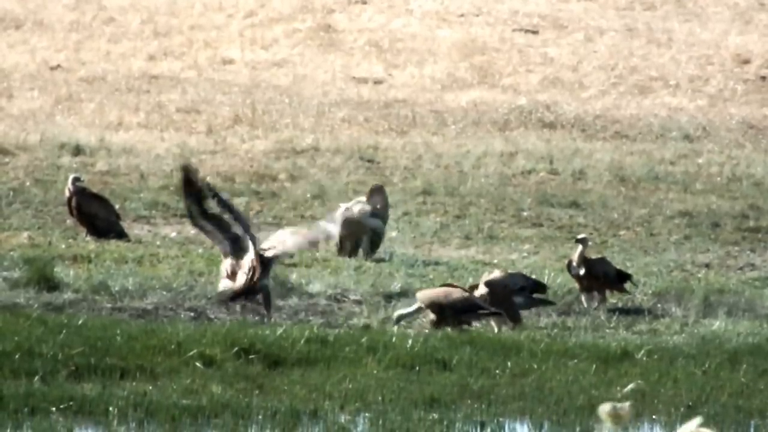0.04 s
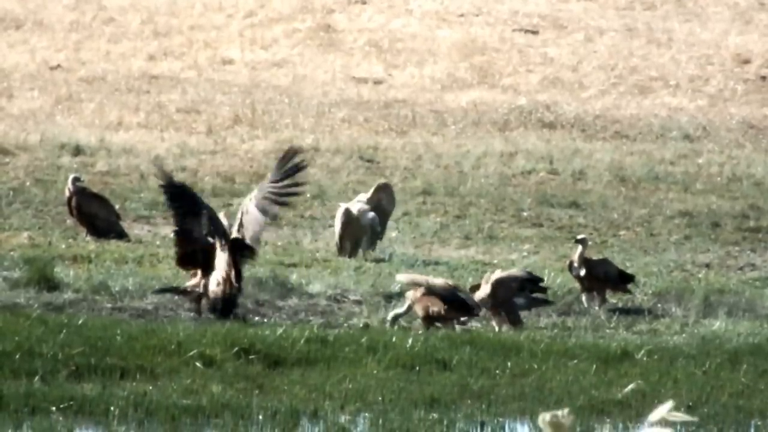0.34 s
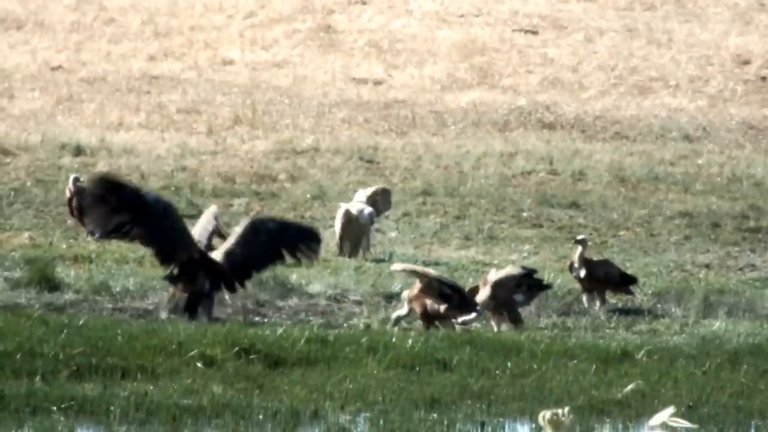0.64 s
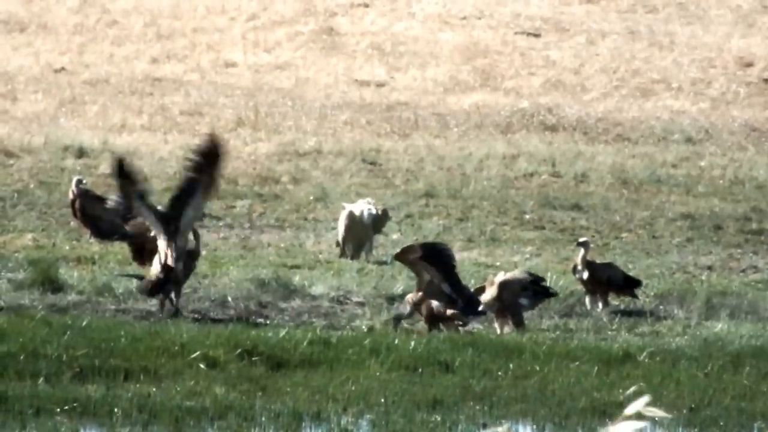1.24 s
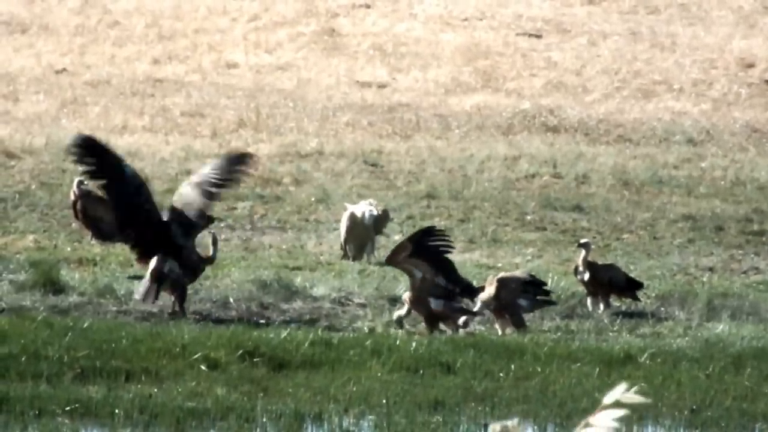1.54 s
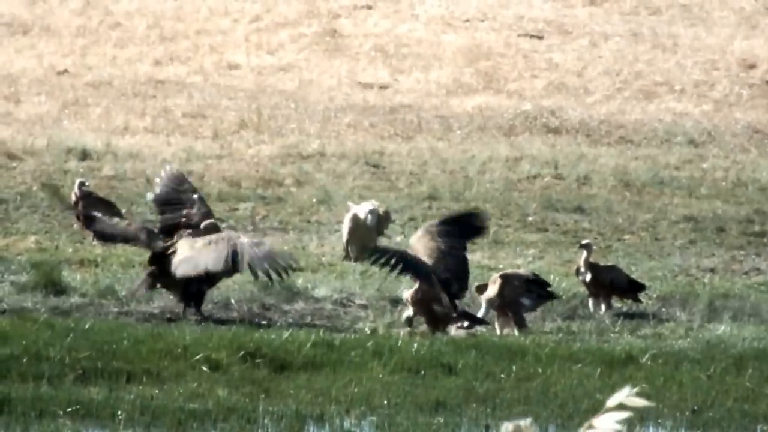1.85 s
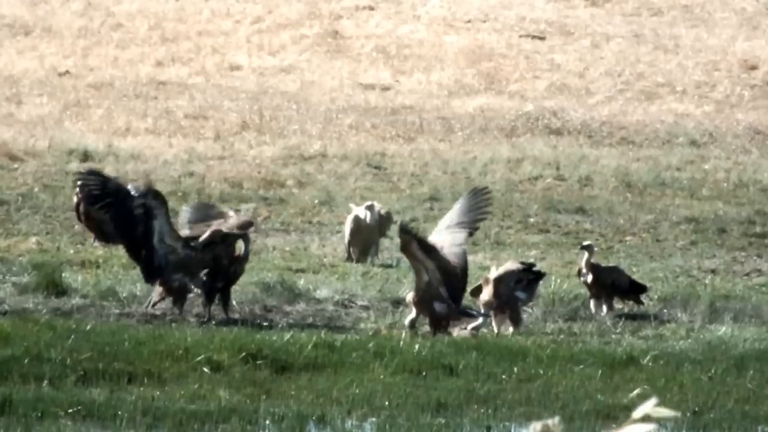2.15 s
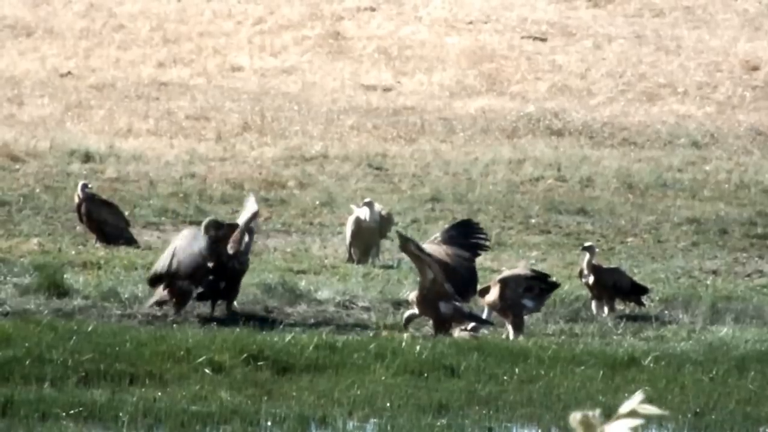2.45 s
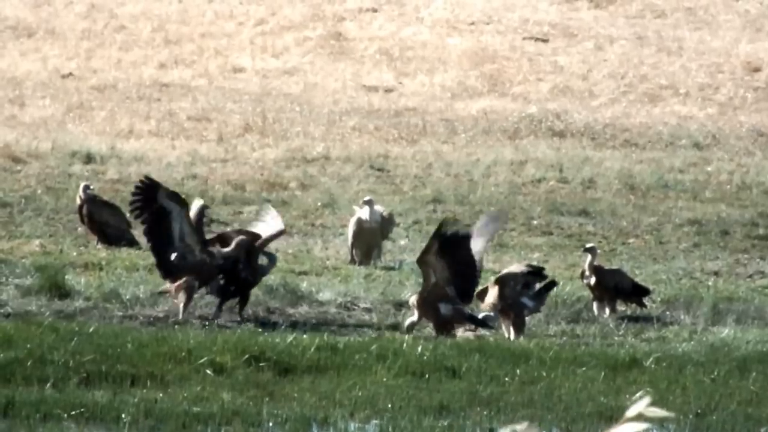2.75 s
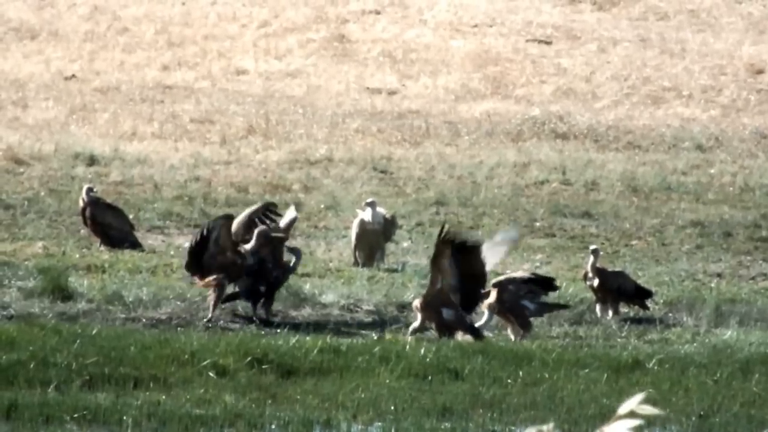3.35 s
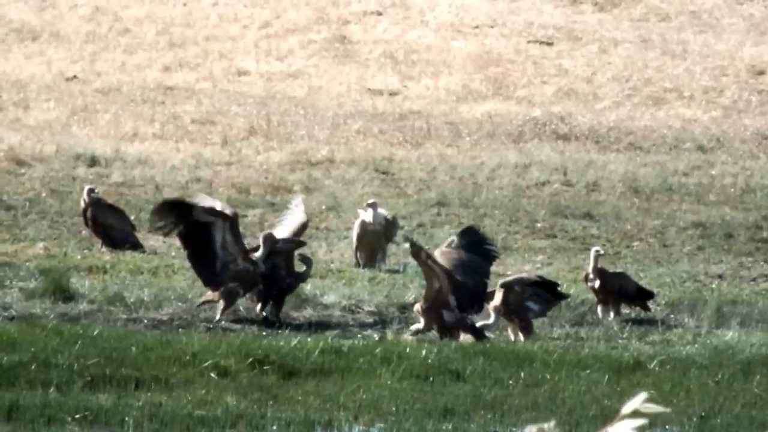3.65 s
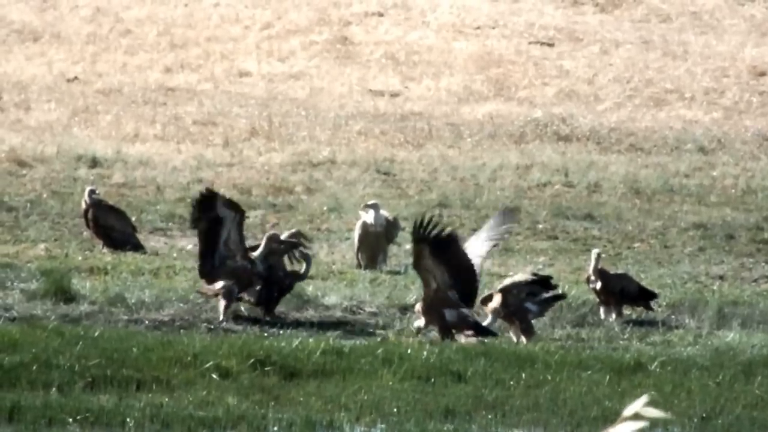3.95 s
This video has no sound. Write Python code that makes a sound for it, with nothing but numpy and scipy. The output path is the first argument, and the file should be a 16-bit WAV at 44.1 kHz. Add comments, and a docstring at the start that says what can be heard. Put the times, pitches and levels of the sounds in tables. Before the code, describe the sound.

Low, gusty wind buffets the left side of the microphone, drops to a brief lull, flutters, then builds to a louder, sputtering rumble. A faint, steady hiss of insects and grass and a few soft bumps fill the open field.

```python
"""A gusty low rumble is heard first: wind over open grassland buffets the left port of a camera microphone,
while the right port lies in its lee. Stronger gusts rumble brighter, spit and shed eddies that thump.
Behind them lie a steady hiss of grass and insects and the camera's thin whine, with a few ticks, far
squeaks and soft bumps. The recorder turns its gain down in the strongest gust."""
import sys
import numpy as np
from scipy import signal
from scipy.fft import rfft, irfft
from scipy.io import wavfile
from scipy.ndimage import uniform_filter1d

SR = 44100
rng = np.random.default_rng(int(sys.argv[2]) if len(sys.argv) > 2 else 0)


def wav_record(signal):
    """Record a signal, one row per channel, as 16-bit PCM in the file named by sys.argv[1]."""
    frames = np.transpose(np.atleast_2d(signal))
    bounded = np.clip(frames, -1, 1)
    # unit amplitude maps onto the largest positive 16-bit level
    quanta = np.round(bounded * 32767).astype(np.int16)
    wavfile.write(sys.argv[1], SR, quanta)


N = 176400
T = np.arange(N) / SR
HZ = np.maximum(np.arange(N // 2 + 1) * SR / N, 1)

# wind pressure at the exposed port: (time [s], relative level [dB])
GUST_PRESSURE = [(0,-34), (.07,-38), (.11,-39), (.33,-40), (.38,-33.5), (.49,-43), (.54,-34.5), (.57,-30),
                 (.61,-39), (.69,-32.5), (.74,-26.5), (.86,-30.5), (.935,-29), (.955,-44), (.975,-29),
                 (1.05,-35.5), (1.09,-39), (1.2,-31), (1.23,-37), (1.275,-33), (1.305,-42.5), (1.41,-42),
                 (1.43,-55), (1.68,-58.5), (1.73,-45), (1.8,-41.5), (1.86,-64.5), (1.94,-52.5),
                 (2.02,-44.5), (2.05,-33.5), (2.08,-47), (2.135,-33), (2.17,-48), (2.194,-37), (2.22,-46),
                 (2.25,-35), (2.285,-44.5), (2.305,-36.5), (2.36,-57), (2.41,-62), (2.45,-40.5), (2.54,-36),
                 (2.65,-46), (2.73,-44), (2.78,-53), (2.87,-40.5), (2.92,-42), (3.0,-38), (3.08,-27.5),
                 (3.2,-31.5), (3.29,-26), (3.33,-30), (3.41,-32), (3.52,-23.5), (3.57,-20.5), (3.6,-20),
                 (3.7,-22.5), (3.8,-22), (4.0,-26.5)]
# eddies striking that port: (time [s], peak level [dB], pitch [Hz], sign [+1 push, -1 pull])
EDDY_STRIKES = [(0.286, -34, 298, 1), (0.38, -15.5, 122, -1), (0.569, -13.5, 129, -1), (0.728, -19, 150, 1),
                (.745, -19, 343, 1), (0.777, -13.5, 360, 1), (0.795, -21.5, 407, -1),
                (0.8485, -12, 248, -1), (0.8786, -17.5, 260, 1), (0.906, -29, 200, 1),
                (0.9293, -13.5, 200, -1), (.991, -21, 348, -1), (1.0403, -21.5, 274, 1),
                (1.193, -21.5, 352, 1), (1.2031, -17, 141, -1), (1.213, -28.5, 352, -1),
                (1.25, -23, 225, -1), (1.4061, -23.5, 161, 1), (2.1295, -29, 162, -1),
                (2.189, -24.5, 221, 1), (2.2422, -27.5, 187, 1), (2.4843, -34, 248, 1),
                (2.5436, -14, 133, 1), (2.5542, -20, 325, -1), (2.8788, -18.5, 157, 1),
                (2.9573, -20.5, 153, 1), (3.072, -10, 212, 1), (3.302, -12.5, 276, 1),
                (3.421, -19.5, 340, -1), (3.555, -11, 290, -1), (3.586, -8, 312, -1),
                (3.609, -14.5, 440, 1), (3.6436, -12, 403, 1), (3.693, -15, 318, 1), (3.711, -15, 414, 1),
                (3.736, -16, 565, -1), (3.776, -17.5, 350, 1), (3.783, -10, 200, -1), (3.807, -11, 218, 1),
                (3.8426, -17.5, 171, 1), (3.825, -27, 520, 1), (3.866, -12, 310, -1), (3.919, -21, 340, 1),
                (3.946, -9.5, 273, -1), (3.988, -8.5, 205, 1)]

GUST_DB = np.interp(T, *np.transpose(GUST_PRESSURE))
GUST_REF_DB, CORNER_HZ = -24.5, 240   # a reference gust and the upper edge of its rumble
NEAR_PAN_DB = [[1.5], [-1.5]]   # ticks and bumps lie a little to the left


def from_db(db):
    """Amplitude grows tenfold every 20 dB."""
    return np.exp(np.asarray(db) * np.log(10) / 20)


def unit_rms(x):
    """Division by the root mean square gives unit power."""
    return x / np.sqrt(np.mean(x ** 2) + 1e-20)


def power(x, seconds):
    """Short-time power is a running mean square."""
    return np.maximum(uniform_filter1d(x ** 2, max(int(seconds * SR), 1)), 1e-12)


def colour(points, column=1):
    """A spectral envelope in dB, interpolated over log frequency."""
    points = np.array(points)
    return np.interp(np.log(HZ), np.log(points[:, 0]), points[:, column])


def band_db(centre_hz, octaves):
    """A flat-topped band-pass response, 3 dB down at the given octaves from its centre."""
    return -10 * np.log10(1 + (np.log2(HZ / centre_hz) / octaves) ** 6)


def noise(db):
    """Filtering white noise gives it a spectral density, in dB per Hz."""
    return irfft(rfft(rng.standard_normal(N)) * from_db(db), N) * np.sqrt(SR / 2)


def port_noise(db):
    """Partial coherence: both ports share one noise and each adds a weaker one; unit power."""
    return unit_rms(noise(db) + .5 * np.array([noise(db), noise(db)]))


def drift(rate_hz, hop=40):
    """Low-passed noise is a slow random fluctuation, here of unit spread."""
    steps = N // hop
    hz = np.arange(steps // 2 + 1) * SR / N
    spectrum = rfft(rng.standard_normal(steps)) / (1 + (hz / rate_hz) ** 2)
    return np.interp(np.arange(N) / hop, np.arange(steps), unit_rms(irfft(spectrum, steps)))


def burst(start, decay_s, attack_s):
    """A damped transient rises linearly and decays exponentially."""
    age = np.maximum(T - start, 0)
    return np.minimum(age / attack_s, 1) * np.exp(-np.maximum(age - attack_s, 0) / decay_s)


def turbulence(corner_hz, low_hz, flutter_db=4, patchy_db=1.37, tilt_db_per_octave=-2.5):
    """Turbulent pressure fluctuates in half-octave bands between the port's bass loss and an upper edge."""
    low_order, high_order = 3.35, 3.16
    flutter = 2 * np.tanh(drift(87) / 2)   # small eddies shake the upper bands together
    white = rfft(rng.standard_normal(N))
    edges = 18 * 2 ** np.arange(0, 7.1, .5)
    out = 0
    for low, high in zip(edges, edges[1:]):
        hz = np.sqrt(low * high)
        band = unit_rms(irfft(white * ((HZ >= low) & (HZ < high)), N))
        bass_loss = 1 + (low_hz / hz) ** (2 * low_order)
        treble_loss = 1 + (hz / corner_hz) ** (2 * high_order)
        shake_db = flutter_db * flutter * np.log2(1 + np.minimum(hz / CORNER_HZ, 2))
        shake_db += patchy_db * drift(15)
        tilt_db = tilt_db_per_octave * np.log2(hz / low_hz)
        out = out + band * np.sqrt(hz / bass_loss / treble_loss) * from_db(shake_db + tilt_db)
    return out / np.sqrt(power(out, seconds=0.0265))   # level evened to 1


def wind(gain_db=6, gust_db_per_octave=29):
    """Faster flow makes louder, brighter turbulence at the exposed port; the lee has only a weak rumble."""
    # draught at the sheltered port: (time [s], level [dB])
    draught = [(0,-52), (.06,-49), (.2,-59), (.5,-53), (.6,-46), (.95,-45.5), (1.15,-50), (1.41,-51),
               (1.47,-46), (1.53,-50), (1.63,-55.5), (2.9,-58.5), (3.25,-46), (3.38,-50), (3.56,-38.5),
               (3.68,-44.5), (4.0,-47)]
    corner_hz = CORNER_HZ * 2 ** ((GUST_DB - GUST_REF_DB) / gust_db_per_octave)
    exposed = from_db(GUST_DB + gain_db) * turbulence(corner_hz, low_hz=84.4)
    sheltered = from_db(np.interp(T, *np.transpose(draught))) * turbulence(corner_hz=273, low_hz=35.4)
    return np.array([exposed + spits() + eddies(), sheltered])


def spits(level_db=-53.5, db_per_gust_db=0.8, rough_db=2.5):
    """Flow separation: gusts tear at the port's rim and sputter, and eddies break up in hissing wakes."""
    wake_db, wake_half_s, wake_ref_hz = -26.5, 0.0036, 438   # small fast eddies hiss most
    hiss = unit_rms(noise(band_db(902, octaves=0.48)))
    sputter = unit_rms(from_db(rough_db * np.minimum(drift(70), 2)))
    flow = from_db(level_db + db_per_gust_db * (GUST_DB - GUST_REF_DB))
    wakes = sum(from_db(db + wake_db) * (hz / wake_ref_hz) ** 2 / (1 + ((T - time) / wake_half_s) ** 4)
                for time, db, hz, _ in EDDY_STRIKES)
    return hiss * (sputter * flow + wakes)


def field(shared_power=0.038, shimmer_db=1.02):
    """Far grass and insects sum to a diffuse hiss, only weakly coherent between the ports."""
    # hiss of the field: (frequency [Hz], left density [dB/Hz], right density [dB/Hz])
    hiss_spectrum = [(30, -73.5, -88), (90, -85, -96), (249, -79.5, -92), (666, -81.5, -85.5),
                     (1230, -88, -91), (2150, -91.5, -95), (3700, -96, -94), (6280, -99, -99.5),
                     (8800, -102, -103), (13200, -108.5, -109), (15500, -116, -116)]
    # raised bands, the insects' near 5 kHz: (centre [Hz], width [Hz], left lift [dB], right lift [dB])
    raised_bands = [(2110, 200, 4.5, 3.5), (2720, 127, 1.5, 7.5), (3340, 147, 5.5, 1.5),
                    (4010, 144, 0.5, 4.5), (5123, 210, 10.5, 8), (5670, 230, 7.5, -5), (6950, 130, 2.5, 1),
                    (7950, 160, 1, -6.5)]
    common, out = noise(0), []
    for side in range(2):
        lift_db = sum(lift[side] * np.exp(-.5 * ((HZ - hz) / width) ** 2)
                      for hz, width, *lift in raised_bands)
        density_db = colour(hiss_spectrum, column=side + 1) + lift_db
        white = np.sqrt(shared_power) * common + np.sqrt(1 - shared_power) * noise(0)
        out.append(irfft(rfft(white) * from_db(density_db), N))
    return np.array(out) * from_db(shimmer_db * drift(18.5))


def rustle(density_db=-91, centre_hz=1720, octaves=0.54, db_per_gust_db=0.15, flicker_db=3):
    """Flow excitation: nearby grass stirs unevenly with the gusts, up to a limit."""
    stir_db = db_per_gust_db * np.minimum(uniform_filter1d(GUST_DB, SR // 5) - GUST_REF_DB, 0)
    db = density_db - 20 * np.log10(1 + (np.log2(HZ / centre_hz) / octaves) ** 2)
    return np.array([noise(db), noise(db)]) * from_db(stir_db + flicker_db * drift(36))


def whine():
    """A line spectrum: steady sinusoids add up to the camera's faint whine."""
    # tones of the camera: (frequency [Hz], rms level [dB])
    tones = [(7094, -91), (14355, -86), (15609, -87)]
    return sum(from_db(db) * np.sqrt(2) * np.sin(2 * np.pi * hz * T) for hz, db in tones)


def ticks():
    """Band-limited noise that decays within milliseconds is heard as a dry tick."""
    # faint ticks: (time [s], level [dB], centre [Hz], decay [s])
    tick_events = [(0.035, -46, 2800, 0.0033), (0.552, -49, 2430, 0.0069), (0.701, -51, 2570, 0.0036),
                   (0.729, -51.5, 2780, 0.005), (3.092, -45, 2390, 0.0041), (3.315, -48, 2720, 0.004),
                   (3.363, -45.5, 2490, 0.0029)]
    out = sum(from_db(db) * burst(time, decay, attack_s=0.0006) * port_noise(band_db(hz, octaves=0.31))
              for time, db, hz, decay in tick_events)
    return out * from_db(NEAR_PAN_DB)


def squeaks(octaves_per_s=-5.5, rough_hz=189):
    """Random modulation spreads a falling tone into a rough narrow band that swells and fades."""
    # far squeaks: (middle time [s], half length [s], starting pitch [Hz] at the middle, level [dB])
    squeak_events = [(0.089, 0.015, 1472, -55.5), (0.174, 0.02, 1600, -53), (0.266, 0.03, 1468, -53.5)]
    out = 0
    for time, half, hz, db in squeak_events:
        pitch_hz = hz * 2 ** (octaves_per_s * np.clip(T - time, -2 * half, 2 * half))
        phase = 2 * np.pi * np.cumsum(pitch_hz) / SR
        tone = drift(rough_hz) * np.sin(phase) + drift(rough_hz) * np.cos(phase)
        swell = np.exp(-np.minimum(((T - time) / half) ** 2, 20))
        out = out + from_db(db) * swell * tone
    return out


def bumps(grain_db=2.5):
    """Friction noise: short grainy scuffs near the microphone have a dull body, some a bright rasp."""
    # scuffs: (time [s], body level [dB], decay [s], rasp level [dB])
    scuffs = [(.168, -47, 0.012, -72), (0.7, -40, 0.0096, -80), (1.066, -41.5, 0.015, -59),
              (1.082, -44, 0.015, -64), (1.103, -49, 0.014, -60), (1.533, -46, 0.01, -72),
              (1.544, -41.5, 0.0068, -53), (1.558, -41, 0.013, -56.5)]
    # spectra of the body and of the rasp: (frequency [Hz], relative density [dB])
    body_spectrum = [(100, -14), (220, 14), (350, 21), (560, 14), (950, 15), (1500, 4.5), (2100, 5),
                     (3500, -20), (7000, -32), (13500, -40), (16000, -50)]
    rasp_spectrum = [(1000, -17), (2200, 4), (4200, 12), (7000, -1), (10500, -7), (13300, -1), (15500, -13)]
    body, rasp = port_noise(colour(body_spectrum)), port_noise(colour(rasp_spectrum))
    out = sum((from_db(body_db) * body + from_db(rasp_db) * rasp) * burst(time, decay, attack_s=0.0083)
              for time, body_db, decay, rasp_db in scuffs)
    return out * from_db(grain_db * drift(240)) * from_db(NEAR_PAN_DB)


def eddies(roundness=5.8):
    """A vortex carried past the port makes one pressure lobe between two smaller opposite ones."""
    out = 0
    for time, db, hz, sign in EDDY_STRIKES:
        distance_squared = (np.pi * hz * (T - time)) ** 2 / roundness
        lobes = (1 - (2 * roundness + 1) * distance_squared) / (1 + distance_squared) ** (roundness + 2)
        out = out + sign * from_db(db) * lobes
    return out


def scene():
    """Superposition: the wind and the sounds of the field add at the two ports."""
    return wind() + field() + rustle() + whine() + ticks() + squeaks() + bumps()


def record(dry, threshold_db=-20, cut_share=0.76, lag_s=.035, release_db_per_s=4.5, cutoff_hz=15650):
    """Automatic gain control follows the exposed port late and recovers slowly; a low-pass cuts the top."""
    level_db = np.interp(T - lag_s, T, 10 * np.log10(power(dry[0], seconds=0.1)))
    over_db = np.maximum(level_db - threshold_db, 0)
    recovery_db = release_db_per_s * T
    cut_db = np.maximum.accumulate(cut_share * over_db + recovery_db) - recovery_db
    low_pass = signal.ellip(12, .1, 70, cutoff_hz, fs=SR, output="sos")
    return signal.sosfiltfilt(low_pass, dry * from_db(-cut_db))


dry = scene()
out = record(dry)
wav_record(out)
```